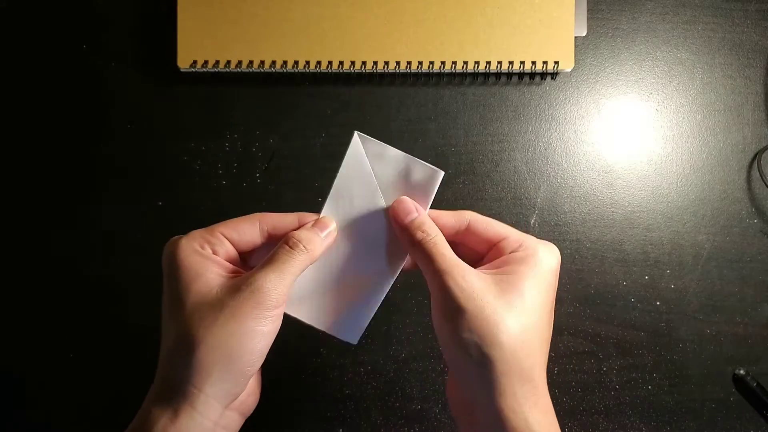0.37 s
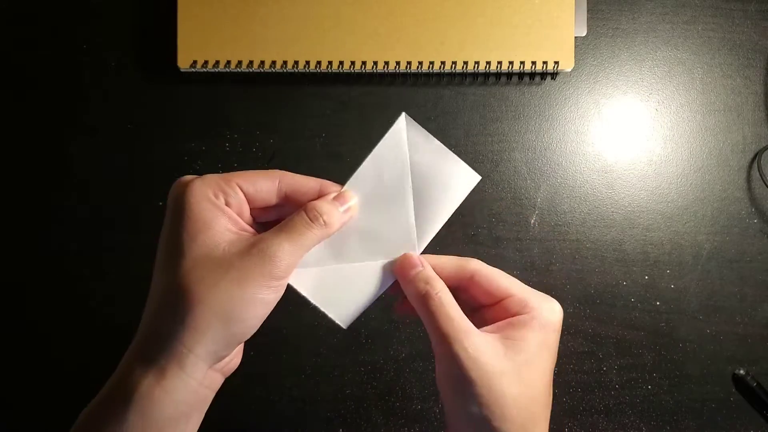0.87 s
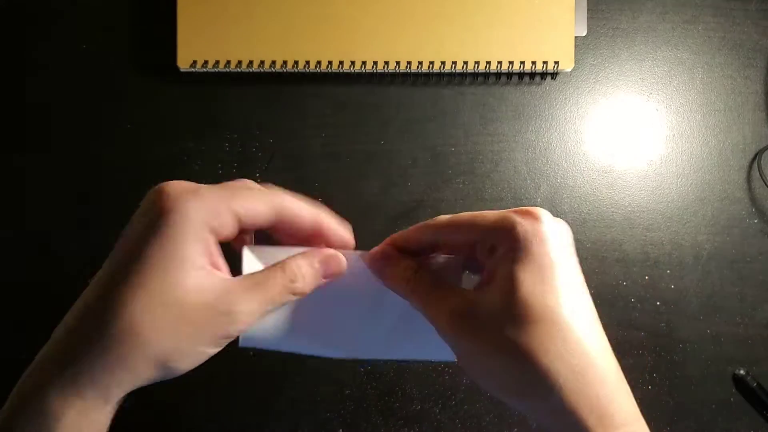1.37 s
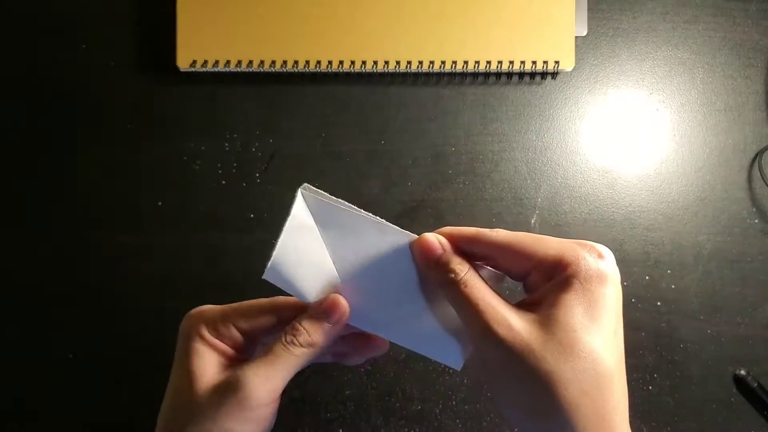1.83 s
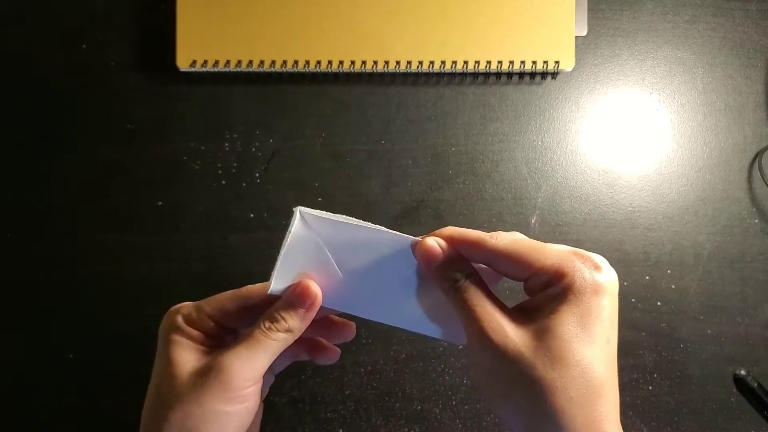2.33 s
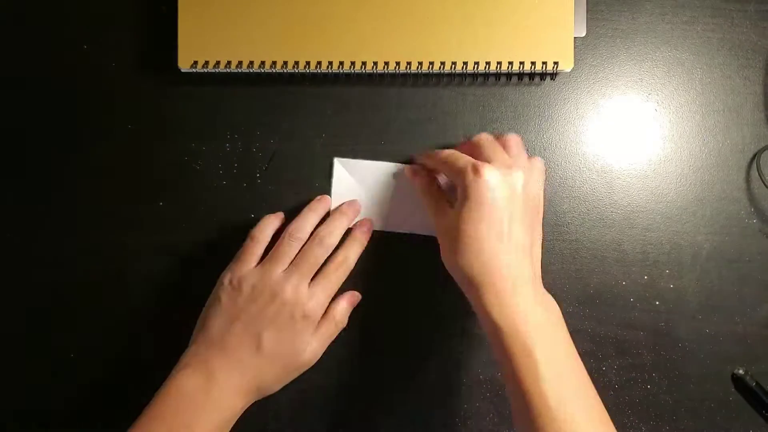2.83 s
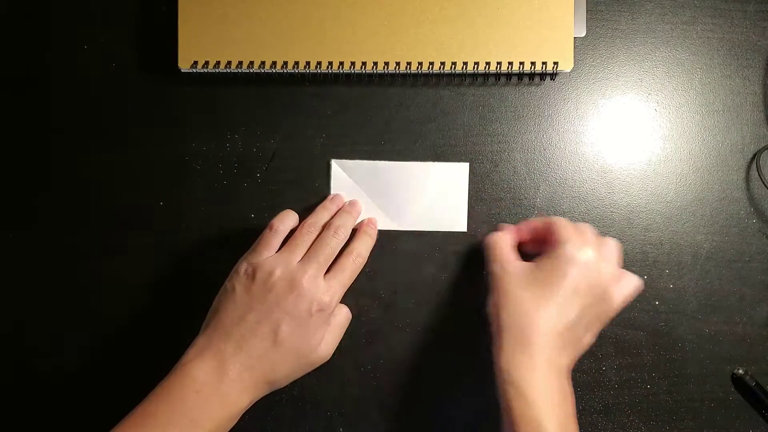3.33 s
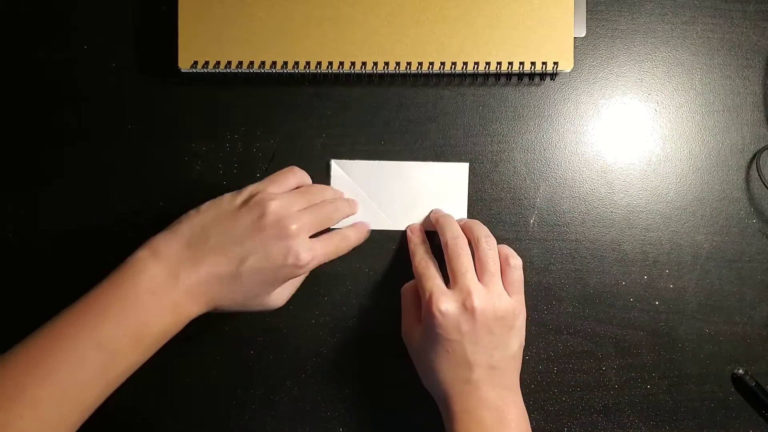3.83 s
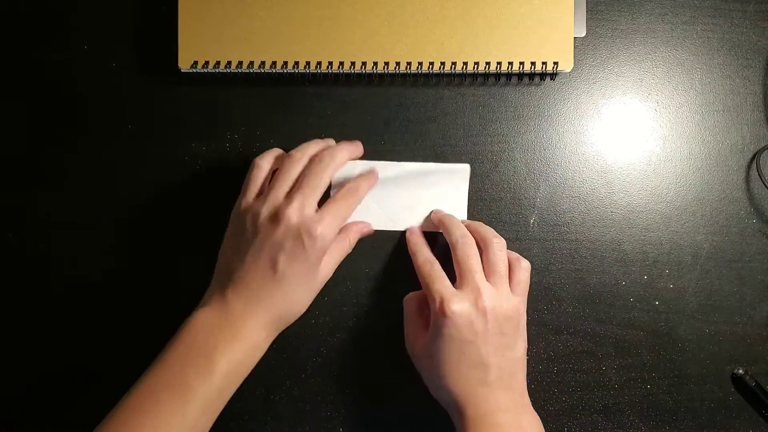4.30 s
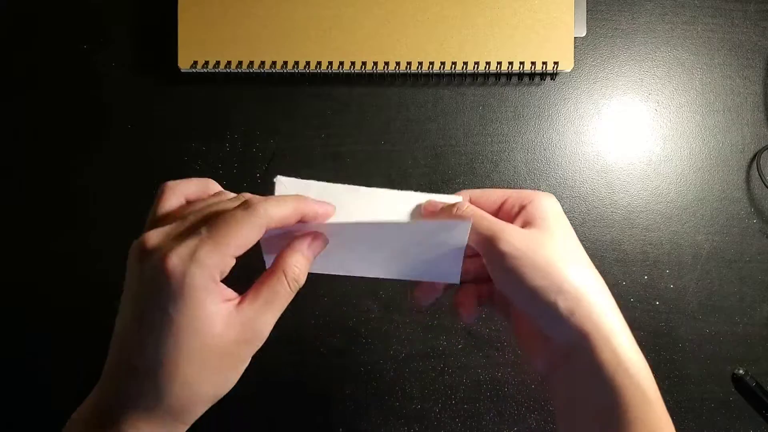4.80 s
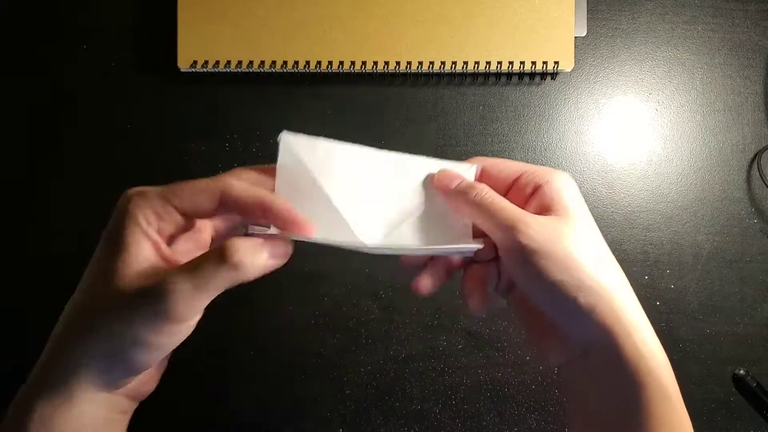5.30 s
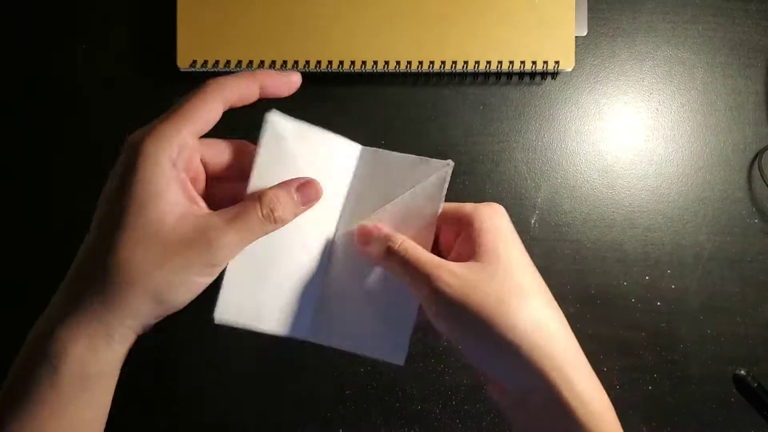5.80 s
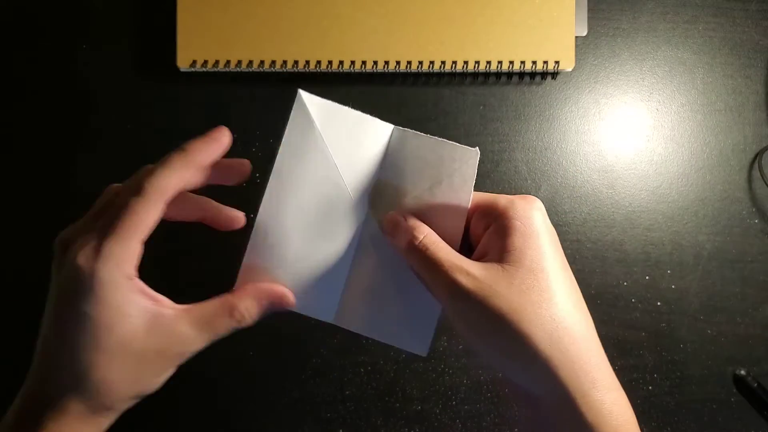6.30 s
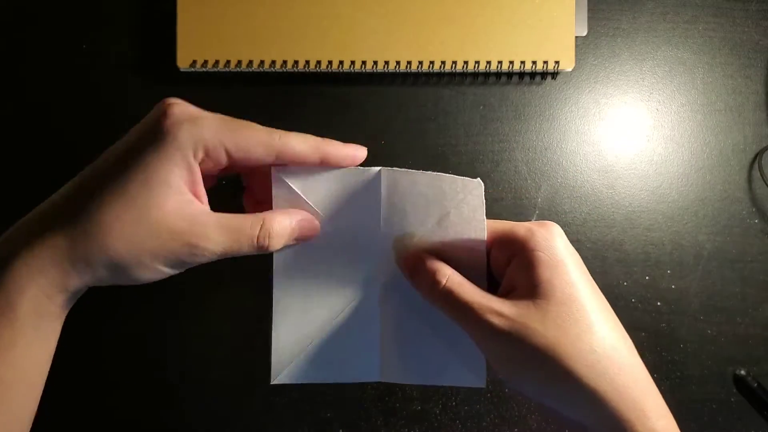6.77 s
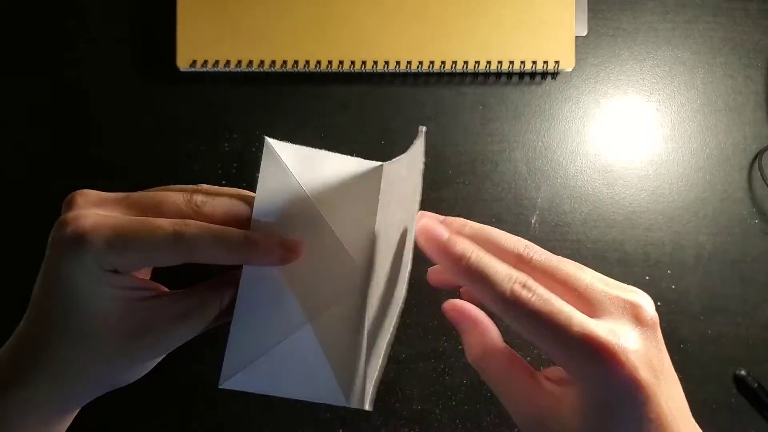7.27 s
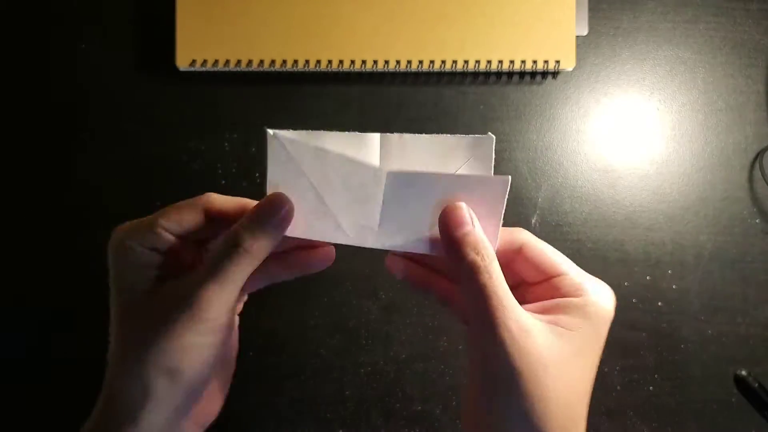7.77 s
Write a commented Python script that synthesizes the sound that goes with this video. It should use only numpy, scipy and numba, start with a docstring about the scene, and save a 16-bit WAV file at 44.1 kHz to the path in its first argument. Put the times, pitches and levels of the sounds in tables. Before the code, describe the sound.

Heard close in stereo, in a quiet room, hands work a small folded sheet of paper over a desk. From 0 to 2.7 s the handling is soft: a brief rub at 0.1, small crackles around 0.3 and 0.7, a bright slide near 1.2, rustles around 1.45, then sparse faint ticks. At about 3.0 the paper meets the desk with a sharp snap; a heavy dull thump follows at 3.2. Firm creasing strokes, knocks and low dragging judder continue, strongest near 3.55, 3.7, 3.9 and 4.2. After 4.4 it is lifted, with a soft rustle near 4.65 and quieter rubbing. At 5.55 it opens with a crisp crackle, then small pops at 5.9 and 6.1, gentle handling, a snap at 7.1, a brighter rustle at 7.3 and a last slide near 7.85. Faint low rumble, wavering hum and hiss persist throughout.

```python
"""A small sheet of paper, folded and creased by hand over a desk in a quiet room, close to a stereo phone.
Finger strokes are grainy noise ringing the sheet's drifting modes; creases are short crackles through the same modes.
Knocks and drags on the desk top ring its decaying sine modes.
Under it lie a low rumble, a wavering hum and a fainter drone, all narrow-band noise, and a faint hiss."""
import sys
import numpy as np
from scipy import signal
from scipy.fft import rfft, irfft
from scipy.io import wavfile
from scipy.ndimage import uniform_filter1d
from numba import njit

SR = 44100
rng = np.random.default_rng(int(sys.argv[2]) if len(sys.argv) > 2 else 0)


def field_ratio(decibels):
    """Amplitude ratio for a level in dB (20 dB per decade); scalars and array-likes work."""
    return 10 ** (np.asarray(decibels, dtype=float) / 20)


def digitize_waveform(pressure):
    """Quantize a signal to 16-bit integers and store it at the path in sys.argv[1].

    Rows of a 2-D input are taken as channels; values are limited to [-1, 1].
    """
    field = np.atleast_2d(pressure).T
    bounded = np.clip(field, -1, 1)
    quanta = np.round(bounded * 32767).astype(np.int16)
    wavfile.write(sys.argv[1], SR, quanta)


N = 347949

# Modes of the paper sheet: f/Hz, width/Hz, relative level/dB
SHEET_MODES = [(1290, 434, 2), (1820, 67, -3.5), (2142, 160, -4.5), (2957, 710, -3.5), (3500, 160, -2.5),
               (4200, 360, -16.5), (4920, 110, -8.5), (6700, 730, -7.5)]


def slide():
    """Skin catches and slips on the fibres: grainy noise rings the sheet, each mode swelling on its own."""
    # Broad rustle, fine fibre hiss and low flexing of the sheet: f/Hz, relative level/dB per Hz
    rustle_spectrum = [(900, -26.5), (1800, -2), (2700, 8.5), (3600, 11), (5200, 7.5), (7000, -3.5),
                       (10000, -37.5)]
    fine_spectrum = [(1500, -47.5), (3500, -10), (5500, -11), (6600, -9.5), (8000, -10.5), (13000, -12),
                     (14700, -16)]
    flex_spectrum = [(400, -23), (800, -5.5), (1050, -7), (1280, -3), (1550, -10), (2200, -14.5),
                     (4500, -37)]
    # Finger strokes: peak t/s, swell/s, fade/s, rustle level/dB, fine hiss level/dB, flex level/dB
    stroke_rows = [(.12, 0.052, 0.044, -56, -54, -67.5), (.268, .04, 0.043, -73.5, -85, -90),
                   (.319, 0.051, 0.073, -76, -100, -72), (.449, 0.029, 0.029, -68.5, -65.5, -81),
                   (.515, 0.065, 0.065, -84, -72.5, -95), (.574, 0.26, 0.073, -78, -85, -80),
                   (.663, .04, 0.11, -76, -70, -85), (.763, .06, 0.1, -91, -76, -87),
                   (.855, 0.033, .03, -90, -73, -90), (.908, 0.026, 0.045, -72, -63.5, -76),
                   (1.033, 0.035, 0.041, -84, -60, -77), (1.227, 0.027, 0.014, -63, -52, -75),
                   (1.452, 0.089, 0.076, -58, -59.5, -59.5), (1.581, 0.075, 0.053, -65.5, -63.5, -76),
                   (1.756, 0.027, 0.07, -66.5, -75, -68), (1.976, 0.063, 0.051, -73.5, -59, -77),
                   (2.195, 0.033, .045, -86, -63.5, -76), (2.372, 0.067, 0.077, -78, -69, -82),
                   (2.704, 0.058, 0.2, -68.5, -65.5, -70), (2.824, 0.19, 0.078, -68, -64.5, -69.5),
                   (2.935, 0.031, .3, -92, -76, -58.5), (2.978, 0.019, 0.046, -68, -81, -40),
                   (3.078, .15, 0.075, -56, -58, -59), (3.198, 0.049, 0.053, -56.5, -48, -85),
                   (3.317, 0.35, .12, -95, -74.5, -74.5), (3.395, .04, .2, -90, -86, -67),
                   (3.45, .05, .15, -76, -75, -61), (3.522, .13, 0.16, -60.5, -53, -53),
                   (3.557, 0.061, 0.046, -45.5, -48, -36), (3.687, 0.023, 0.11, -78, -68, -66),
                   (3.816, 0.065, 0.18, -76.5, -68, -69), (3.865, 0.093, .1, -73, -67, -63),
                   (3.906, 0.041, 0.052, -48.5, -51.5, -48), (4.041, .025, 0.042, -70.5, -75, -65.5),
                   (4.225, 0.097, 0.065, -62.5, -58.5, -53.5), (4.34, 0.049, 0.025, -92, -64.5, -92),
                   (4.415, 0.09, 0.1, -98, -76, -74), (4.57, 0.079, 0.27, -73, -59, -72),
                   (4.605, .04, .1, -80, -75, -62), (4.654, 0.078, 0.075, -55.5, -60, -57),
                   (4.694, 0.19, 0.023, -58.5, -64.5, -61), (4.864, 0.054, .1, -71.5, -64, -82),
                   (5.019, 0.025, .07, -95.5, -80, -71), (5.163, 0.048, 0.12, -71.5, -57.5, -78),
                   (5.275, .1, 0.089, -90.5, -75, -99), (5.435, 0.067, .06, -78, -72, -96),
                   (5.547, 0.12, 0.083, -54, -56, -58.5), (5.637, .06, 0.2, -63.5, -62.5, -70.5),
                   (5.787, 0.062, 0.47, -57, -60.5, -69), (5.877, 0.26, 0.12, -68, -57, -71),
                   (6.111, 0.44, 0.47, -94, -68.5, -76), (6.321, 0.067, 0.044, -87, -75, -62.5),
                   (6.445, 0.14, 0.55, -76, -66.5, -79), (6.83, 0.27, 0.41, -88, -70, -78),
                   (6.924, 0.23, 0.1, -62, -62, -68.5), (7.034, 0.045, 0.039, -73, -73, -78),
                   (7.119, 0.072, 0.13, -73, -69, -67), (7.254, 0.07, 0.13, -64.5, -68, -73),
                   (7.328, 0.1, 0.034, -54.5, -52.5, -63), (7.37, .05, 0.054, -87, -80, -61.5),
                   (7.478, 0.092, 0.083, -72.5, -66, -66.5), (7.628, 0.055, 0.17, -78, -77, -87.5),
                   (7.693, 0.11, 0.091, -90, -74, -74), (7.837, 0.043, 0.051, -60, -64.5, -73)]
    # The sheet only held: rustle level/dB, fine hiss level/dB, flex level/dB
    held_levels = (-95.5, -98, -95)
    rustle_db, fine_db, flex_db = strokes(stroke_rows, held_levels)
    catch_db = 2.2 * walk(80)

    # small buckles pop now and then among the steady friction, about 90 per second
    pops = (rng.random(N) < 90 / SR) * field_ratio(2.5 * rng.exponential(size=N)) * 7
    skin = pair(0.082) * field_ratio(catch_db + 1.9 * walk(500)) + pops
    rings = sum(sheet_mode(skin, *mode) for mode in SHEET_MODES)
    ring_spectrum = rustle_spectrum[:2] + [(7000, -7), rustle_spectrum[-1]]
    rustle = 0.75 * colour(skin, rustle_spectrum) + 0.8 * colour(rings, ring_spectrum)

    # single fibres let go as tiny bright ticks, about 12 per second
    ticks = (rng.random(N) < 12 / SR) * field_ratio(2.5 * rng.exponential(size=N)) * 11
    fibres = pair(0.046) * field_ratio(catch_db + 1.0 * walk(700)) + ticks
    fine = colour(fibres, fine_spectrum)

    flex = colour(pair(0.11) * field_ratio(catch_db + 2.5 * walk(120)), flex_spectrum)
    mix = rustle * field_ratio(rustle_db) + fine * field_ratio(fine_db) + flex * field_ratio(flex_db)
    return mix * sides(3.8)


def sheet_mode(skin, hz, width, db):
    """One mode of the sheet: bending shifts its pitch, the grip lets it swell and damps it again."""
    centre = hz * (1 + 0.05 * walk(6))
    swell = field_ratio(db + 4.5 * walk(26)) / np.sqrt(width)
    return swell * np.array([svf(x, centre, 1.0 * width) for x in skin])


@njit
def svf(x, hz, width):
    """Band-pass whose centre moves sample by sample; gain 1 at the centre."""
    y, band, low = np.empty(len(x)), 0.0, 0.0
    for i in range(len(x)):
        g, damping = np.tan(np.pi * hz[i] / SR), width / hz[i]
        v = (band + g * (x[i] - low)) / (1 + g * (g + damping))
        band, low, y[i] = 2 * v - band, low + 2 * g * v, damping * v
    return y


def snaps():
    """Creases giving way one by one, each at its own pitch and side."""
    # Creases: t/s, ring peak level/dB, ring f/Hz, tick peak above ring/dB, t60/s (held to 0.008-0.12),
    # left minus right/dB
    snap_rows = [(0.298, -46.5, 3200, -31, 0.078, 3), (0.548, -42, 3080, -40, 0.04, 2.5),
                 (0.671, -44, 3200, -21, 0.061, -2), (0.679, -32.5, 3900, -12, 0.026, 2.5),
                 (1.025, -62, 3950, -20, 0.083, 3), (1.207, -50.5, 1190, -2, 0.088, 0),
                 (1.396, -45.5, 2030, -15, 0.099, 1), (1.433, -39.5, 3600, 2, 0.085, 4.5),
                 (1.577, -57.5, 1270, 9, 0.091, 5), (1.746, -66, 1230, -25, 0.041, 5.5),
                 (2.153, -61.5, 5230, 6, 0.1, 4), (2.356, -62.5, 1210, -4, 0.032, 8),
                 (2.384, -66, 6300, 9, 0.035, 14), (2.981, -21.5, 4200, -0.5, 0.032, 1.5),
                 (3.059, -50.5, 1340, 17, 0.039, 0), (3.174, -50.5, 4100, -8, 0.13, 10.5),
                 (3.187, -44.5, 845, 5, 0.15, -1), (3.447, -51.5, 851, -28, 0.059, -6),
                 (3.549, -36, 1720, -35, 0.055, -12), (3.689, -41.5, 4380, -36, 0.036, 2),
                 (3.902, -28.5, 1040, -34, 0.091, -3), (4.034, -63, 1020, -24, 0.049, -4),
                 (4.211, -32, 1500, -6, 0.096, -0.5), (4.395, -49.5, 824, -60, 0.07, 4),
                 (4.675, -34, 3900, -31, 0.028, 0), (4.85, -61.5, 2600, -20, 0.11, 4),
                 (5.018, -59, 1645, -30, 0.04, 7), (5.152, -56, 3500, -20, 0.14, 16.5),
                 (5.508, -41.5, 3320, -13, 0.05, 8), (5.515, -51.5, 3780, 11, 0.043, -4),
                 (5.544, -43, 4030, -2, 0.05, 14), (5.56, -27.5, 2780, -4.5, 0.062, -0.5),
                 (5.862, -32, 2860, -31, 0.045, 5), (5.926, -44, 2880, -27, 0.03, 2),
                 (6.089, -42, 1900, -19, 0.088, 3), (6.119, -38.5, 2070, -31, 0.044, 5),
                 (6.289, -57, 2750, 0.5, 0.12, 4), (6.316, -50.5, 1400, -32, 0.053, 4),
                 (6.424, -56, 1330, -10, 0.1, 5.5), (6.544, -61.5, 1290, 3.5, 0.11, 6),
                 (6.813, -49.5, 3630, -4, 0.13, 3.5), (6.921, -49.5, 1110, -20, 0.12, 1),
                 (7.117, -33.5, 1330, -30, 0.032, 4.5), (7.462, -63, 2130, -10, 0.036, 5),
                 (7.633, -52.5, 1030, -5.5, 0.087, 3.5), (7.685, -57.5, 790, -19, 0.042, 9)]
    return place([row[0] for row in snap_rows], [snap(*row[1:]) for row in snap_rows])


def snap(db, hz, treble_db, t60, pan_db):
    """A crackle that dies fast rings the sheet's modes near its own pitch; a shorter bright tick starts with it."""
    t = np.arange(4096) / SR
    f = np.fft.rfftfreq(len(t), 1 / SR) + 1
    fade = np.exp(-np.log(1000) * t / np.clip(t60, 0.008, 0.12))
    crackle = pair(0.37, len(t)) * fade * np.minimum(t / 0.001 + 0.35, 1)

    answer = 0.3  # the rest of the sheet answers without pitch
    for mode_hz, width, gain_db in SHEET_MODES:
        gain = field_ratio(gain_db + 3.8 * rng.standard_normal())
        answer = answer + gain / (1 + 1j * (f - mode_hz * mode_hz / f) / width)
    own_pitch = 1 / (1 + 1j * 1.4 * (f / hz - hz / f))
    ring = irfft(rfft(crackle) * answer * own_pitch / (1 + (f / 7000) ** 4), len(t))

    # the second fade makes the tick shorter than the ring
    tick = irfft(rfft(crackle * fade) / (1 + (6000 / f) ** 6) / (1 + (f / 9500) ** 4), len(t))
    both = ring / np.abs(ring).max() + field_ratio(treble_db) * tick / np.abs(tick).max()
    return both * field_ratio(db) * sides(pan_db)


def knocks():
    """Fingertips, wrists or the sheet land on the desk: soft pushes that ring its modes."""
    # Landings: t/s, peak level/dB, contact/ms, upper modes' level/dB
    knock_rows = [(0.3, -41.5, 0.74, 12), (0.545, -57, 1.4, 3), (0.596, -57, 1.1, 4.0),
                  (0.675, -54, 4.3, -15), (0.96, -53, 4.2, -15), (1.199, -57, 0.89, 13),
                  (1.205, -50.5, 3, -10), (1.386, -52, 6, -15), (1.744, -44.5, 3, 10), (1.96, -57, 5, -15),
                  (2.075, -54, 3.3, -15), (2.356, -51, 2.9, 6), (2.598, -54, 5, -15),
                  (2.977, -37.5, 1.7, 2), (3.194, -15, 1, -4), (3.437, -30.5, 1.6, -6.5),
                  (3.548, -18, 0.68, 18), (3.655, -37, 3.2, -15), (3.691, -18.5, 3.3, -15),
                  (3.899, -24, 0.99, -0.5), (4.029, -37.5, 2.2, 15), (4.172, -34, 1.7, -0.5),
                  (4.208, -23.5, 0.36, 10), (4.22, -31.5, 0.39, 17), (4.395, -36.5, 1.8, 7.5),
                  (4.616, -49, 5, -15), (4.835, -52, 3.8, -15), (5.02, -63, 0.6, 15),
                  (5.083, -53.5, 4, -16), (5.14, -51, 5.3, -15), (5.388, -58, 3, -15), (5.559, -39, 1, 15),
                  (5.77, -48, 5, -15), (5.856, -36.5, 1.9, 1.5), (6.117, -35, 0.53, 14),
                  (6.282, -51, 2.6, 0), (6.43, -50.5, 1.45, 6), (6.546, -56, 5, -15), (6.91, -59, 1.3, -9),
                  (7.114, -41.5, 1, 11.5), (7.232, -61, 4, -9), (7.475, -53.5, 3.4, -10),
                  (7.631, -47.5, 2.2, 12), (7.82, -51, 6.2, -14)]
    sounds = []
    for _, db, ms, upper_db in knock_rows:
        # a softer fingertip pushes longer and wakes fewer high modes
        push = np.hanning(max(int(ms * SR / 1000), 1) + 2)
        y = signal.fftconvolve(desk_ring(upper_db, tilt_db=3.5), push[None])
        sounds.append(y / np.abs(y).max() * field_ratio(db) * sides(0.7))
    return place([row[0] for row in knock_rows], sounds)


def drags():
    """Hands dragging or shifting: a rough judder rings the desk's modes."""
    drag_db = drag_level()
    judder = uniform_filter1d(pair(0.7) * field_ratio(2.5 * walk(160)), size=24)
    dull = signal.fftconvolve(judder, desk_ring(0, -15.0, -4.0), axes=1)[:, :N]
    bright = signal.fftconvolve(judder, desk_ring(0, -15.0, 7.0), axes=1)[:, :N]
    # harder pressure wakes the higher modes
    hard = np.clip(field_ratio(0.67 * (drag_db + 41.5)), 0.03, 1)
    shake = dull / dull.std() + hard * bright / bright.std()
    return field_ratio(drag_db) * shake * sides(1.5)


def drag_level():
    """Level in dB of the hands' shaking of the desk; between drags they lie nearly still."""
    # Drags and shifts: peak t/s, swell/s, fade/s, level/dB
    drag_rows = [(.559, 0.039, 0.094, -58.5), (.683, 0.12, 0.25, -66.5), (1.217, .03, 0.15, -67),
                 (1.402, 0.031, .025, -59), (1.447, 0.022, 0.045, -53.5), (1.586, .2, 0.11, -68),
                 (1.766, .05, .1, -59), (2.774, 0.29, 0.12, -62.5), (2.98, 0.095, 0.19, -56),
                 (3.088, 0.19, 0.086, -55.5), (3.218, 0.067, 0.059, -44.5), (3.39, 0.032, .2, -62),
                 (3.502, 0.11, 0.27, -46.5), (3.577, 0.41, 0.026, -42), (3.675, .06, 0.19, -54.5),
                 (3.821, 0.14, .3, -47), (3.875, 0.21, 0.16, -45.5), (3.911, 0.17, 0.058, -38),
                 (4.18, .04, .15, -49.5), (4.23, 0.096, 0.064, -41.5), (4.42, 0.33, 0.054, -67),
                 (4.689, 0.23, .065, -56.5), (5.517, .07, .3, -55.5), (5.567, 0.23, 0.046, -52),
                 (5.892, 0.24, 0.16, -55.5), (6.021, 0.064, 0.033, -54), (6.316, 0.12, 0.16, -64),
                 (6.43, 0.038, 0.036, -55), (6.924, 0.084, .05, -52.5), (7.029, .2, 0.13, -74),
                 (7.139, .045, 0.046, -62.5), (7.234, 0.018, 0.37, -61.5), (7.383, 0.18, .035, -56),
                 (7.473, 0.053, 0.31, -65.5), (7.638, .055, 0.071, -60), (7.757, .4, .1, -70),
                 (7.842, 0.051, 0.035, -55.5)]
    return strokes(drag_rows, [-79])[0]  # -79 dB: hands lying still


def desk_ring(upper_db, lower_db=0, tilt_db=0):
    """The desk top's answer to one blow; upper modes start at random phases, a little apart at the two sides."""
    # Modes of the desk top: f/Hz, relative level/dB, t60/s
    desk_modes = [(66.1, 2, 0.16), (127.7, 2, 0.1), (217.3, -6, 0.037), (275.8, -10, 0.056),
                  (375, -11.5, 0.044), (427.7, -10.5, 0.058), (491.6, -15.5, 0.089), (604, -8, 0.031),
                  (749, -21, .03), (940, -26.5, .02), (1300, -30, .015)]
    upper_hz = 180
    t = np.arange(SR // 4) / SR
    out = 0
    for hz, db, t60 in desk_modes:
        upper = hz > upper_hz
        phase = upper * (2 * np.pi * rng.random() + 0.5 * rng.standard_normal((2, 1)))
        share_db = upper_db + tilt_db * np.log2(hz / upper_hz) if upper else lower_db
        fade = np.exp(-np.log(1000) * t / t60)
        out = out + field_ratio(db + share_db) * np.sin(2 * np.pi * hz * t + phase) * fade
    return out * np.minimum(t / 0.00074, 1)  # 0.74 ms onset


def rumble_and_hum():
    """Two low bands of noise, at 62 and 121.6 Hz, that flutter and rise when hands shake the desk."""
    shake = field_ratio(drag_level())
    # capped walks: both dip deeper than they swell
    rumble_gain = field_ratio(-66 + 4.5 * np.minimum(walk(14), 1.2)) + field_ratio(-6.5) * shake
    hum_gain = field_ratio(-70.5 + 4 * np.minimum(walk(16), 1.2)) + field_ratio(-4) * shake
    rumble = colour(pair(0.52), peak(62, 43))
    hum = colour(pair(0.91), peak(121.6, 20))
    return rumble * rumble_gain + hum * hum_gain


def drone():
    """A faint, wavering narrow band of noise at 267.2 Hz."""
    return colour(pair(0.8), peak(267.2, 35)) * field_ratio(-84.5) * field_ratio(3.5 * walk(9))


def hiss():
    """Steady room and microphone noise, nearly the same at both microphones below about 500 Hz."""
    # Spectrum of the steady noise: f/Hz, relative level/dB per Hz
    hiss_spectrum = [(88, -9), (150, 0), (182, -15), (257, -5.5), (330, -21.5), (586, -34.5), (928, -28.5),
                     (1360, -24), (2000, -35.5), (6820, -35), (14700, -33.5)]
    mid, side = rng.standard_normal((2, N))
    side = signal.sosfilt(signal.butter(1, 500, "high", fs=SR, output="sos"), side)
    return colour(mid + side * np.array([[1], [-1]]), hiss_spectrum) * field_ratio(-76)


def strokes(table, rest_db):
    """Level in dB of each column: every stroke swells to its peak and fades; powers add."""
    span_db = 30  # climb during the swell, and drop during the fade
    t = np.arange(0, N + 64, 64) / SR
    s, swell, fade, *columns = np.transpose(table)[:, :, None]
    rising = (s - t) / np.maximum(swell, 0.005)
    falling = (t - s) / np.maximum(fade, 0.005)
    shape_db = -span_db * np.maximum(rising, falling)
    levels = []
    for db, rest in zip(columns, rest_db):
        power = field_ratio(2 * rest) + field_ratio(2 * (db + shape_db)).sum(axis=0)
        levels.append(np.interp(np.arange(N) / SR, t, 10 * np.log10(power)))
    return levels


def colour(x, spectrum):
    """Shape x by (Hz, dB) points, then bring it to rms 1."""
    hz, db = np.transpose(spectrum)
    f = np.fft.rfftfreq(N, 1 / SR) + 1
    gain_db = np.interp(np.log(f), np.log(hz), db, -90, -90)
    y = irfft(rfft(x) * field_ratio(gain_db), N)
    return y / y.std()


def peak(hz, width):
    """A resonance as (Hz, dB) points, width in Hz between its -6 dB points."""
    f = hz * np.geomspace(1 / 4, 4, 200)
    return np.transpose([f, -20 * np.log10(1 + ((f - hz * hz / f) / width) ** 2)])


def walk(rate):
    """Random levels held 1 / rate s and slewed twice; spread near 1."""
    k = int(SR / rate)
    held = np.repeat(rng.standard_normal(N // k + 1), k)
    return 1.6 * uniform_filter1d(uniform_filter1d(held, k), k)[:N]


def pair(alike, length=N):
    """Noise for both microphones, correlated by alike (0 to 1)."""
    alike = np.clip(alike, 0, 1)
    mid, side = rng.standard_normal((2, length))
    return np.sqrt((1 + alike) / 2) * mid + np.sqrt((1 - alike) / 2) * side * np.array([[1], [-1]])


def sides(pan_db):
    """Left and right gains, pan_db apart."""
    return field_ratio(np.outer([0.5, -0.5], pan_db))


def place(times, sounds):
    """Lay short two-channel sounds at their times in seconds."""
    out = np.zeros((2, N + SR))
    for s, sound in zip(times, sounds):
        i = int(s * SR)
        out[:, i:i + sound.shape[-1]] += sound
    return out[:, :N]


def scene():
    """Sheet, desk and room; the sheet lies a little nearer the left microphone."""
    sheet = slide() + snaps()
    sheet[1] = np.roll(sheet[1], 2)  # the far microphone hears it 2 samples later
    return sheet + knocks() + drags() + rumble_and_hum() + drone() + hiss()


def band_limit(x):
    """A steep low-pass at the top of the band."""
    return signal.sosfilt(signal.butter(12, 15820, fs=SR, output="sos"), x)


def record(dry):
    """The phone rolls off the deepest bass below 50.5 Hz and cuts the top above 14650 Hz."""
    bass_cut = signal.butter(3, 50.5, "high", fs=SR, output="sos")
    top_cut = signal.ellip(8, 0.2, 50, 14650, fs=SR, output="sos")
    mix = signal.sosfilt(top_cut, signal.sosfilt(bass_cut, dry))
    return band_limit(mix)


dry = scene()
out = record(dry)
digitize_waveform(out)
```